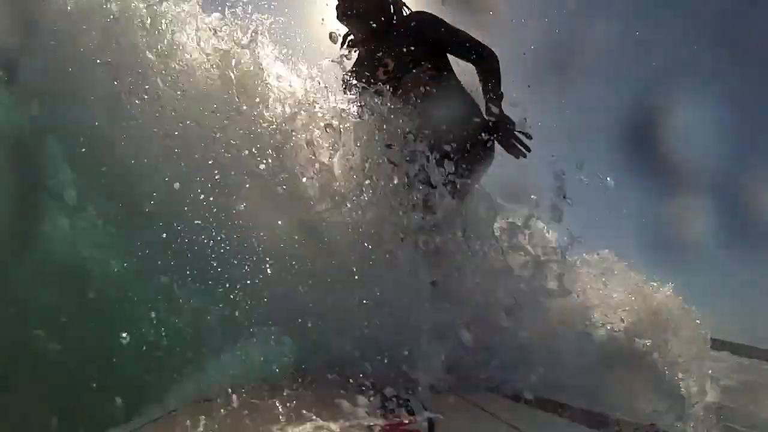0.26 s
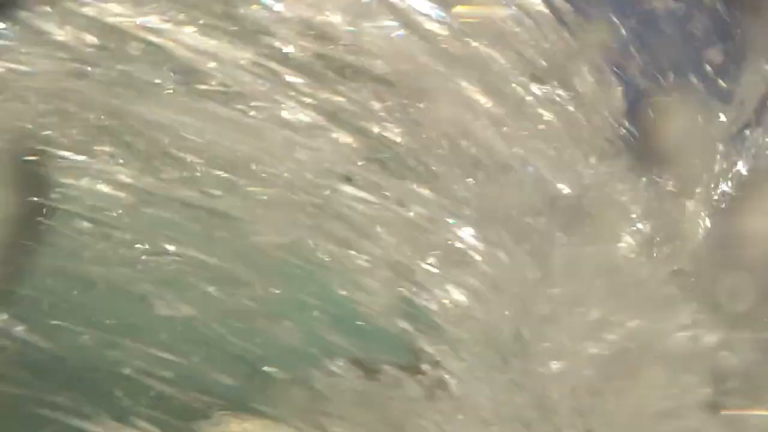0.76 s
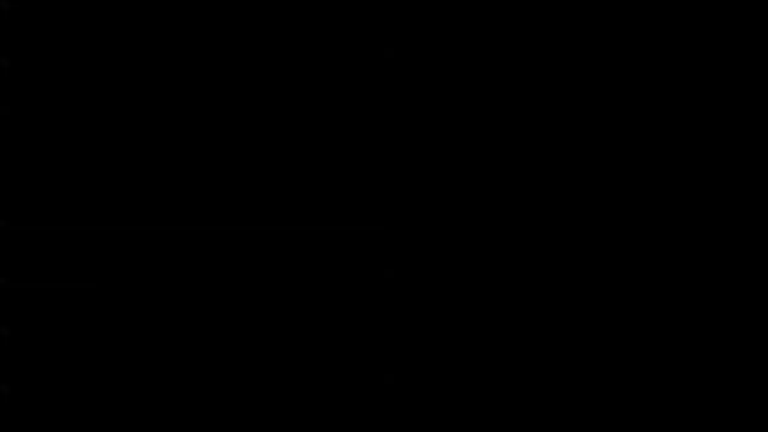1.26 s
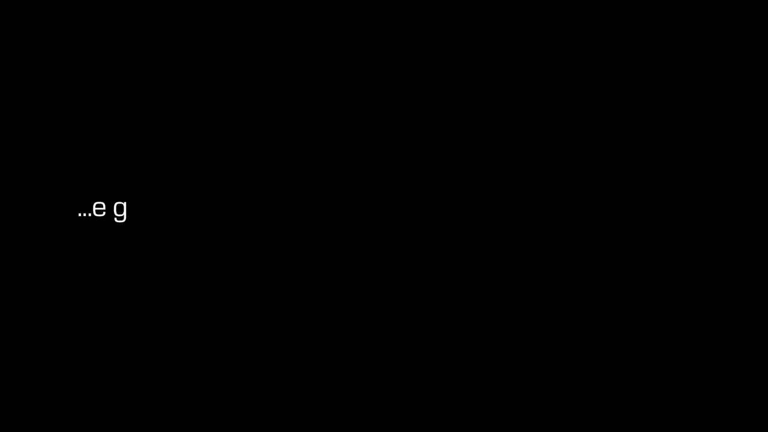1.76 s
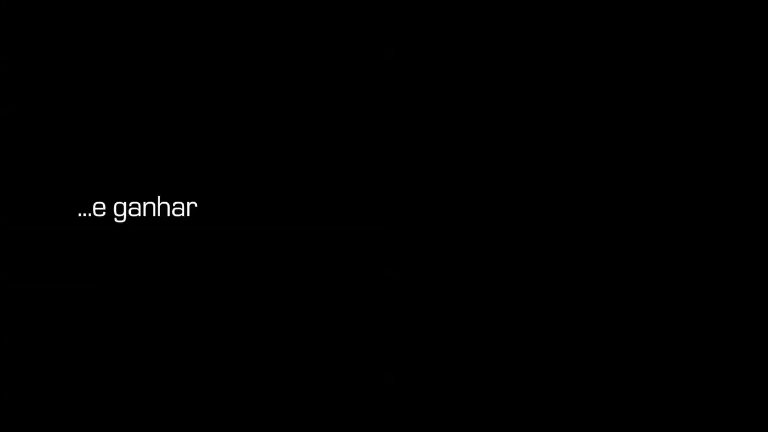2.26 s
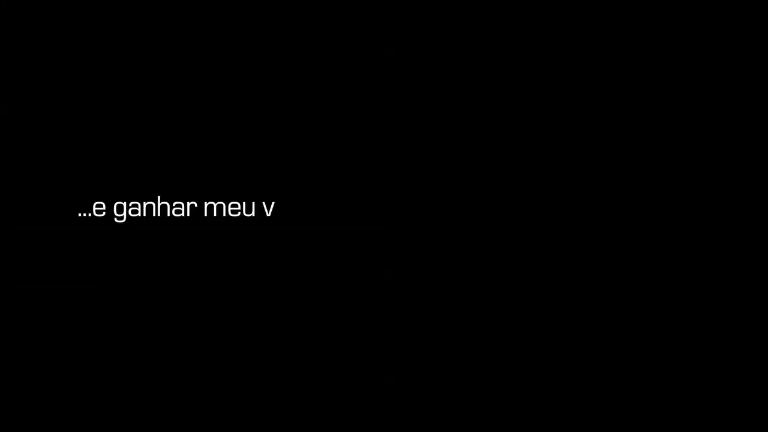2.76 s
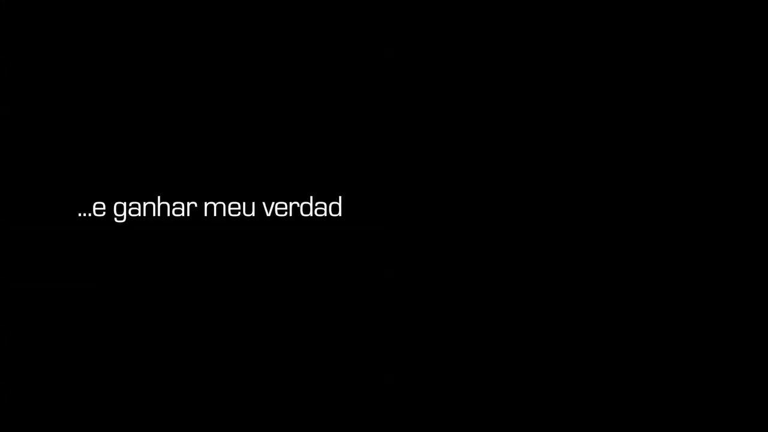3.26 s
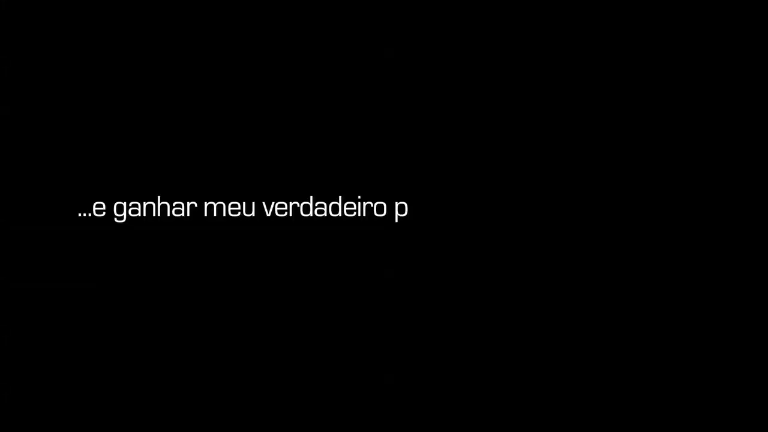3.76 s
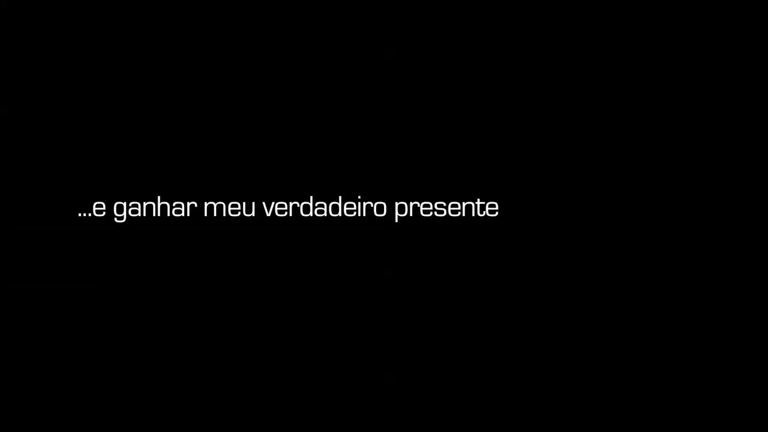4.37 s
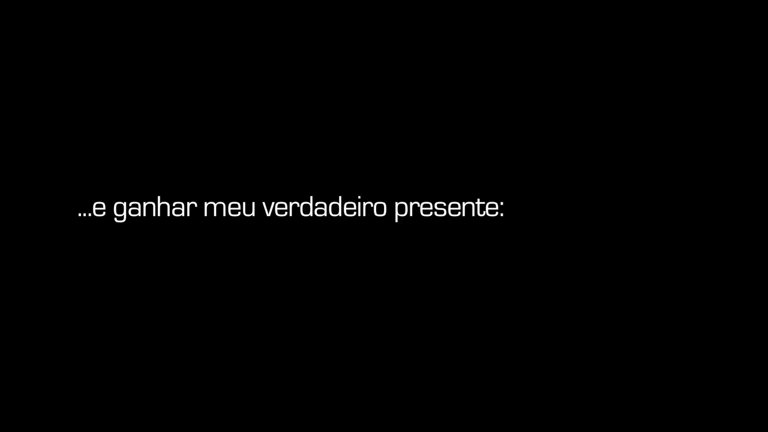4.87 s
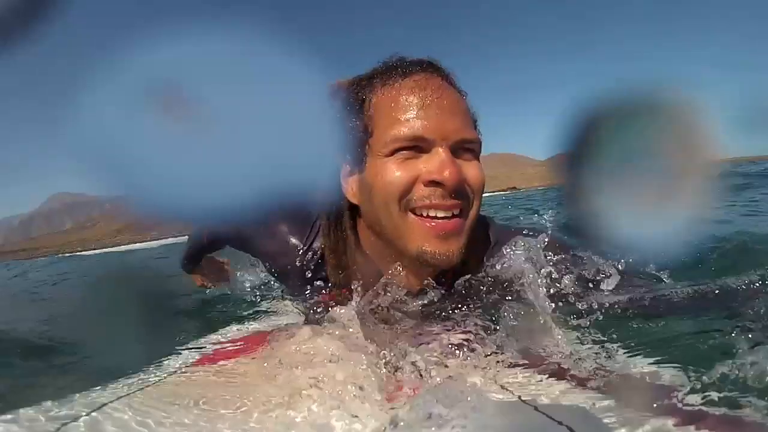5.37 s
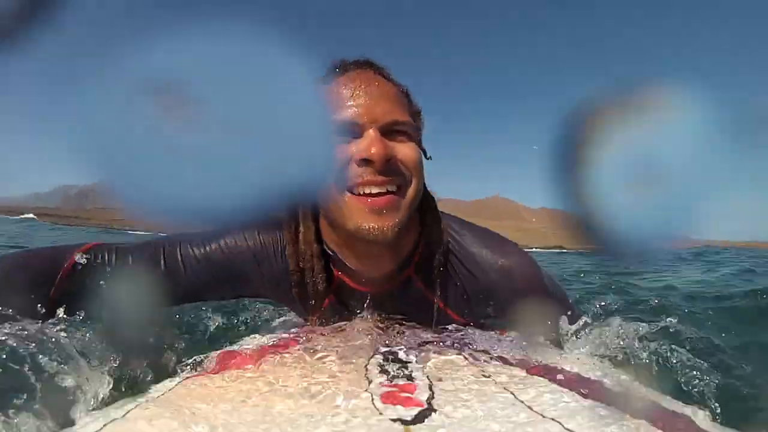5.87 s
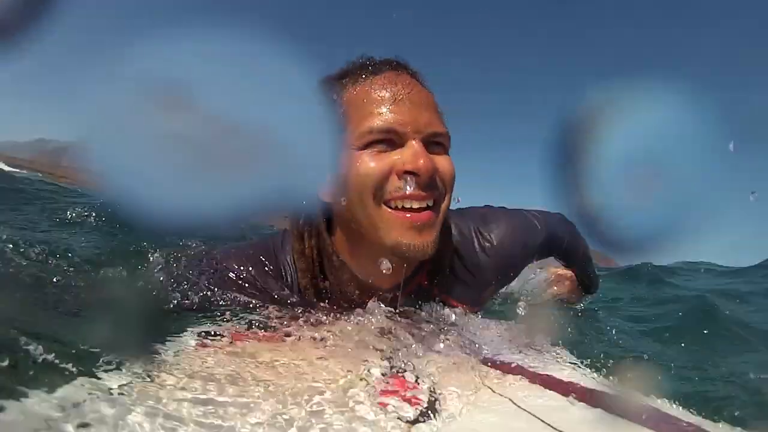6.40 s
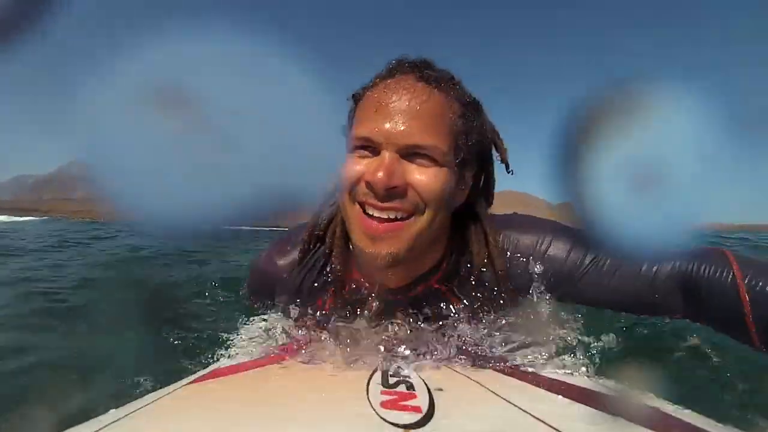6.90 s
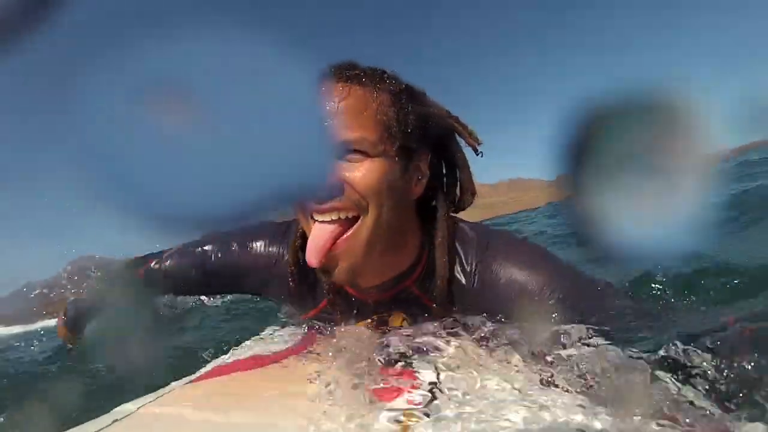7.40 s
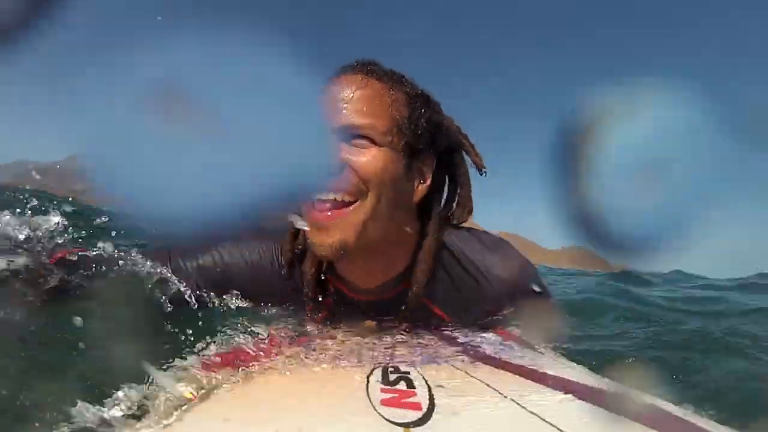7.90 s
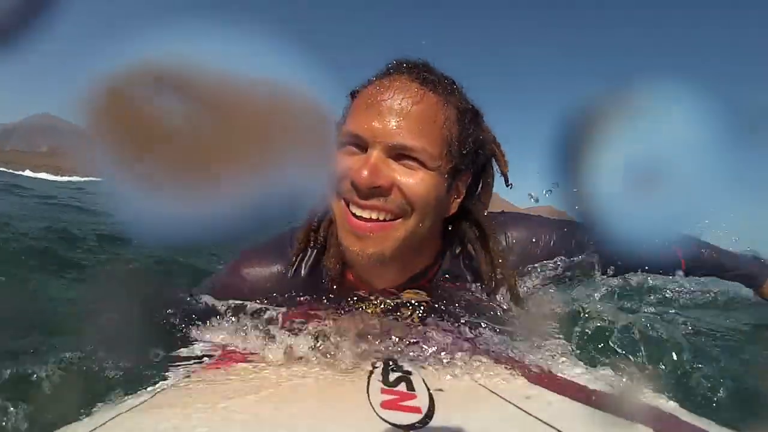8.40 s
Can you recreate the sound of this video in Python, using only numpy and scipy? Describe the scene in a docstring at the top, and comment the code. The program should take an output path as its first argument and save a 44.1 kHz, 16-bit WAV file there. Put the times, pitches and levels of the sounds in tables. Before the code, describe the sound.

Very close on a surfboard, a breaking wave rumbles, slaps and hisses over a waterproof case, with deep booms and a muffled submerged churn. It cuts abruptly to faint, irregular keyboard typing over soft ventilation in a room. Almost a second of complete silence follows. Then the sea returns loudly: paddling sloshes water across the board with low hollow thumps, gurgles, slaps and small drop ticks.

```python
"""Surf and typing

A waterproof case rides on a surfboard while a wave breaks over it; water is shaped noise and ringing bubbles.
Then a keyboard is typed on in a ventilated room (struck plastic over soft noise), and almost a second is silent.
Back at sea, paddling arms slosh water over the board: it booms in decaying low tones while drops tap the case.
"""
import sys
import numpy as np
from scipy import signal
from scipy.fft import rfft, irfft
from scipy.io import wavfile
from scipy.ndimage import uniform_filter1d, minimum_filter1d

SR = 44100
rng = np.random.default_rng(int(sys.argv[2]) if len(sys.argv) > 2 else 0)


def store_wav(level_fs):
    """Save 16-bit WAV to argv[1]."""
    pcm = np.round(np.clip(np.atleast_2d(level_fs), -1, 1) * 32767)
    wavfile.write(sys.argv[1], SR, pcm.T.astype(np.int16))


N = 381453
TIME = np.arange(N) / SR

RIDE, TYPING, PADDLE = (0, 1.289), (1.289, 4.503), (5.416, 8.66)  # (from s, to s)


def amp(db):
    """Turns decibels into a gain."""
    return 10 ** (np.asarray(db) / 20)


def evened(x):
    """Scales a sound to an rms of 1."""
    return x / np.sqrt(np.mean(x ** 2) + 1e-20)


def peaked(x):
    """Scales a sound to a peak of 1."""
    return x / (abs(x).max() + 1e-20)


def steadied(x, seconds):
    """Keeps the fast grain of a sound but holds its rms near 1 over the given time."""
    size = max(int(seconds * SR), 8)
    power = uniform_filter1d(uniform_filter1d(x ** 2, size), size)
    return x / np.sqrt(abs(power) + 1e-12)


def read(points, hz):
    """Reads a table of (f/Hz, value) on a log-frequency axis."""
    f, value = np.transpose(points)
    return np.interp(np.log(hz + 1), np.log(f + 1), value)


def add(mix, s, sound):
    """Adds a sound to the mix at time s."""
    part = mix[..., max(round(s * SR), 0):][..., :sound.shape[-1]]
    part += sound[..., :part.shape[-1]]


def ring_of(points, size=8192):
    """Turns a spectrum into a ring that starts at once; it falls 30 dB more per octave past its ends."""
    hz = abs(np.fft.fftfreq(size, 1 / SR)) + 1
    octaves_out = abs(np.log2(hz / np.clip(hz, points[0][0], points[-1][0])))
    level_db = np.maximum(read(points, hz) - 30 * octaves_out, -100)
    log_gain = np.log(amp(level_db))
    # the Hilbert transform finds the phase that puts all the sound after the start
    return np.fft.ifft(np.exp(np.conj(signal.hilbert(log_gain)))).real[:size // 2]


def coloured(x, points):
    """Passes a sound through a spectrum."""
    return signal.oaconvolve(x, ring_of(points))[:len(x)]


def rung(force, ring):
    """Gives a body's answer to a force on each side, scaled to an rms of 1."""
    answer = signal.fftconvolve(force, ring[None], axes=1)
    return evened(answer[:, :force.shape[1]])


def shot(span):
    """Is 1 inside a span of time and 0 elsewhere, with very short ramps."""
    return uniform_filter1d(1. * ((TIME >= span[0]) & (TIME < span[1])), size=64)


def wander(per_s, depth_db):
    """Makes a gain that drifts at random between per_s new values a second."""
    return amp(depth_db * np.interp(TIME * per_s, np.arange(N), rng.standard_normal(N)))


def struck(modes, t, detune):
    """Sums decaying tones of a struck body; each blow lands elsewhere and shifts them a little."""
    out = 0
    for hz, db, t60 in modes:
        shifted_hz = hz * (1 + detune * rng.uniform(-0.55, 1))
        out = out + amp(db - 60 * t / t60) * np.sin(2 * np.pi * shifted_hz * t)
    return out


def bubble(hz, cycles, glide=0.024):
    """A pocket of air rings for a few cycles and rises a little in pitch."""
    age = np.arange(int(5 * cycles * SR / hz) + 4) * hz / SR / cycles  # 1 when faded to 1/e
    fade = (1 - np.exp(-age * cycles)) * np.exp(-age)
    return fade * np.sin(2 * np.pi * cycles * age * (1 + glide * age / 2))


def bubbles(lo_hz, hi_hz, cycles, per_s, spread_db, wash, count=24):
    """A swarm of bubbles of many sizes, a few of them loud, over a white wash of countless faint ones."""
    chance, kind = rng.random(N), rng.integers(0, count, N)
    size = np.minimum(rng.exponential(1, N), 4)
    born, out = np.flatnonzero(chance < per_s / SR), np.zeros(N)
    pitches = np.geomspace(lo_hz, hi_hz, count)
    shapes = [bubble(hz, cycles) * np.sqrt(hz / lo_hz) for hz in pitches]
    for at in born:
        sign = (-1) ** at
        add(out, at / SR, shapes[kind[at]] * amp(spread_db * size[at]) * sign)
    return evened(out) + wash * rng.standard_normal(N)


def patter(per_s, spread_db):
    """Countless droplets, each a dry tick of its own size."""
    size = amp(spread_db * np.minimum(rng.exponential(1, N), 4))
    sign = np.sign(rng.standard_normal(N))
    return evened(size * sign * (rng.random(N) < per_s / SR))


SURGE_CURVE = 1.1  # 1 gives a pointed crest, 2 a rounded one


def swell(crest_s, rise_s, fall_s):
    """A gain that rises to 1 at the crest and drains away."""
    age = TIME - crest_s
    widths = np.maximum(-age / max(rise_s, .002), age / max(fall_s, .002))
    gain, near = np.zeros(N), widths < 8
    gain[near] = np.exp(-widths[near] ** SURGE_CURVE)
    return gain


# slow run of the water in each sea shot, before the mix:
# (t/s, buffeting of the board level/dB, gurgle under it level/dB, slosh on the case level/dB, spray level/dB)
RIDE_FLOW = [(0, -21, -23, -31.5, -41.5), (0.05, -12, -37, -26.5, -49), (0.17, -13.5, -38, -34.5, -59),
             (0.39, -20, -36, -36.5, -51), (0.57, -23, -39.5, -38, -55), (0.66, -19, -34, -35.5, -39),
             (0.85, -23.5, -35, -27, -34.5), (0.95, -15.5, -32, -37, -48.5),
             (1.07, -20.5, -39.5, -43.5, -47.5), (1.22, -12, -37.5, -41.5, -47.5),
             (1.28, -19.5, -37, -49.5, -56)]
PADDLE_FLOW = [(5.42, -15.5, -34, -38.5, -49.5), (5.59, -26, -40, -39.5, -60), (5.8, -26, -44, -28.5, -63),
               (5.91, -23, -45, -54, -80), (6.05, -26, -42, -40, -58.5), (6.23, -29, -35, -32.5, -54),
               (6.33, -17, -37.5, -48, -78), (6.52, -17.5, -34, -32.5, -50.5), (6.7, -29, -43, -43, -57),
               (6.83, -30, -42.5, -40.5, -61), (6.95, -18, -39, -32, -52), (7.17, -26, -28.5, -32, -61),
               (7.4, -28, -37.5, -36, -56.5), (7.61, -35.5, -37, -40, -68.5), (7.75, -27.5, -41, -41, -66),
               (8.1, -30.5, -42, -40, -58), (8.45, -25.5, -38.5, -41.5, -65),
               (8.65, -36.5, -41.5, -33.5, -49)]
# rushes of water across the board, before the mix:
# (crest t/s, rise t/s, fall t/s, gurgle level/dB, slosh level/dB, spray level/dB)
SURGES = [(0.031, 0.014, 0.013, -28.5, -38, -58), (0.32, 0.063, 0.044, -26.5, -24, -47),
          (0.448, 0.021, 0.055, -25, -26.5, -37), (0.612, 0.0041, 0.03, -38, -32, -30.5),
          (0.688, 0.0083, 0.034, -25.5, -15, -22.5), (0.779, .012, 0.048, -28.5, -29, -40),
          (0.98, 0.044, 0.013, -29.5, -30.5, -33), (5.758, .025, .018, -40.5, -27.5, -44.5),
          (5.823, 0.012, 0.027, -25.5, -25, -44), (5.882, 0.021, 0.0044, -20, -11.5, -37.5),
          (5.98, 0.046, 0.024, -32, -27, -68), (6.18, .015, .025, -35, -42, -62),
          (6.276, 0.014, 0.0092, -35, -36, -43.5), (6.345, 0.031, 0.059, -30, -32, -58),
          (6.505, 0.029, .04, -33.5, -33, -62), (6.897, .02, 0.0099, -35, -17.5, -45.5),
          (6.985, 0.033, 0.21, -53, -29, -48.5), (7.766, .004, 0.022, -45, -38, -42.5),
          (7.835, 0.032, 0.047, -25, -26, -48.5), (7.96, 0.013, 0.023, -41, -52, -46.5),
          (8.055, 0.0041, 0.015, -50, -42, -38), (8.26, 0.04, 0.064, -48, -41, -53),
          (8.402, 0.01, 0.013, -29, -26, -48)]
GULP_RISE_S, GULP_FALL_S = .003, 0.016


def water():
    """Strength of buffeting, gurgle, slosh and spray: slow flow, surges on top, a gulp after each blow."""
    s, *columns = np.transpose(list(RIDE_FLOW) + list(PADDLE_FLOW))
    power = np.array([amp(np.interp(TIME, s, c)) for c in columns]) ** 2
    for crest_s, rise_s, fall_s, *levels_db in SURGES:
        power[1:] += np.outer(amp(levels_db) ** 2, swell(crest_s, rise_s, fall_s) ** 2)
    for s, *_, gulp_db in BLOWS:
        gulp = swell(s + GULP_RISE_S, GULP_RISE_S, GULP_FALL_S)
        power[1] += (amp(gulp_db) * gulp) ** 2
    return np.sqrt(power)


# spectra of the shaken board, its drumming hollow, and the large and small air pockets: (f/Hz, level/dB)
RUMBLE = [(15, -16), (25, -5.5), (45, -5), (62, 3), (76, 7.5), (90, -1.5), (120, -21.5), (170, -28.5)]
DRUM = [(110, -10), (145, -2), (175, -1), (210, -7.5)]
GURGLE = [(110, -14.5), (150, -5), (200, -6), (235, -2.5), (262, 3.5), (300, -5.5), (400, -11), (520, -23)]
CHURN = [(330, -15.5), (430, 2.5), (520, -2), (680, 1.5), (790, -2), (900, -10), (1050, -11)]
SUNK, CHURNING = (.92, 1.34), (0.764, 1.34)  # s: the wave covers the board; small air pockets fill it
CHURN_SUNK_DB, CHURN_POWER = 7, 1.162  # small air pockets multiply faster than large ones
HEAVE_PER_S, HEAVE_DB = 14, 2.5  # the buffeting comes in uneven shoves
DRUM_DB, DRUM_POWER = -10, 1.61  # hard buffeting drums on the hollow of the slowly floating board


def under_board(buffet, gurgle):
    """Moving water shakes the board, and air pockets gurgle against its hollow."""
    churn = amp(CHURN_SUNK_DB * shot(CHURNING)) * gurgle ** CHURN_POWER
    buffet = buffet * wander(per_s=HEAVE_PER_S, depth_db=HEAVE_DB)
    rumble = steadied(coloured(rng.standard_normal(N), RUMBLE), seconds=.04)
    # under water the buffeting reaches higher
    sunk_spectrum = [(85, -1), (110, 14.5), (140, -2), (165, -19.0), (200, -32.5)]
    sunk = steadied(coloured(rng.standard_normal(N), sunk_spectrum), seconds=0.079)
    rumble += amp(-9.5) * sunk * uniform_filter1d(shot(SUNK), size=2048)
    drum = evened(coloured(rng.standard_normal(N), DRUM))
    rumble += amp(DRUM_DB) * shot(PADDLE) * buffet ** (DRUM_POWER - 1) * drum
    large = coloured(bubbles(150, 420, cycles=2.9, per_s=160, spread_db=1.0, wash=1.3), GURGLE)
    small = coloured(bubbles(400, 1000, cycles=3.8, per_s=400, spread_db=6.0, wash=4.7), CHURN)
    out = amp(-1.0) * buffet * rumble
    out += amp(-3.0) * gurgle * steadied(large, seconds=0.087)
    return out + amp(-3.0) * churn * steadied(small, seconds=0.023)


# spectra of the ringing case, the spray and the finest mist: (f/Hz, level/dB)
CASE = [(470, -21.5), (780, -6), (890, -18.5), (1000, -3), (1090, 2), (1200, -2), (1400, 2.5), (1610, -2.5),
        (2000, -0.5), (2400, 0.5), (2650, -7.5), (3000, -15.5), (3550, -18), (4500, -32.5)]
SPRAY = [(1800, -11), (3000, 0), (3700, 2), (4500, -3.5), (6000, -1.5), (7400, -4.5), (8600, -13),
         (11800, -14.5), (13000, -20), (15200, -26), (16000, -40)]
MIST = [(5000, -25.5), (7500, 6), (9000, 0), (11600, 1), (13000, -6), (15200, -9.5), (16000, -22)]
# the finest mist follows the spray weakly; speed adds to it (levels before the mix)
MIST_DB, MIST_POWER, MIST_RIDE_DB = -55.5, 0.21, 4.5


def over_case(slosh, spray):
    """Water sloshes on the case and throws spray; the finest mist differs from side to side: (2, N)."""
    mist = amp(MIST_DB + MIST_RIDE_DB * shot(RIDE)) * spray ** MIST_POWER
    lumps = wander(per_s=40, depth_db=3.5)  # water arrives in lumps, for large and small drops alike
    rush = 1 + 1.3 * shot(RIDE)  # at speed the bubbles merge into a smoother wash
    wet = bubbles(950, 3800, cycles=4.4, per_s=700, spread_db=4.5, wash=1.5 * rush, count=48)
    wet = coloured(wet, CASE)
    # spray both ticks on the case and fizzes
    ticks = 2.3 * patter(per_s=760, spread_db=5.0)
    fizz = bubbles(3000, 9000, cycles=6.7, per_s=520, spread_db=4.6, wash=0.86 * rush, count=48)
    fizz = coloured(ticks + fizz, SPRAY)
    fine = np.array([evened(coloured(rng.standard_normal(N), MIST)) for _ in range(2)]) * lumps
    middle = amp(-1.0) * slosh * steadied(wet * lumps, seconds=0.046)
    middle += spray * steadied(fizz * lumps, seconds=.05)
    sides = fine[0] + .45 * fine[1] * np.array([[1], [-1]])
    return middle + amp(-6.5) * mist * sides


# chop hitting the board, before the mix:
# (t/s, boom level/dB, hollow knock level/dB, boom f/Hz, gulp of trapped air level/dB)
BLOWS = [(0.04, -9, -38, 71, -37), (0.107, -6.5, -44, 70, -43.5), (0.55, -11, -43, 60, -38),
         (0.367, -5.5, -38, 67, -32), (0.444, -4, -30, 70, -36), (0.712, -3, -25, 58, -22.5),
         (0.99, -1.5, -21.5, 90, -29), (1.202, -5, -31, 102, -34), (1.226, -11, -57.5, 89.9, -41),
         (5.424, -15, -39, 75, -19.5), (5.877, -0.5, -23, 76, -23), (5.987, -13.5, -35, 77, -28),
         (6.269, -5, -37, 62, -22), (6.473, -8, -32, 73, -25), (6.886, -10, -30, 64, -17.5),
         (7.107, -7, -16, 74.5, -18), (7.439, -39, -36, 76, -30), (8.019, -21, -34, 103, -21),
         (8.226, -11, -28, 81, -21.5), (8.401, -14, -11, 68.4, -20.5)]
# higher modes of board and mount: (f/Hz, level/dB, time to fall 60 dB t/s)
BOARD = [(140, -5, 0.055), (180, -7, 0.05), (266, 6, 0.16), (341, -8, .03), (560, -12.5, .025),
         (690, -6, 0.022)]


def blows():
    """Chop strikes the board: a deep boom and a short hollow knock, both made of decaying tones."""
    out, t = np.zeros(N), np.arange(SR // 4) / SR
    for s, boom_db, knock_db, hz, _ in BLOWS:
        boom = struck([(hz, 0, .12)], t, detune=.01)
        knock = struck(BOARD, t, detune=.04)
        add(out, s, -amp(boom_db - 2) * peaked(boom) - amp(knock_db - 1.5) * peaked(knock))
    return out


# slaps of water on the case: (t/s, level/dB before the mix, trapped air f/Hz, fade t/s of the small pockets)
SLAPS = [(0.2612, -9, 1190, 0.014), (0.2896, -10.5, 1270, 0.028), (0.3668, -9, 1580, 0.0027),
         (0.446, -7.5, 2040, 0.01), (0.524, -14, 1350, 0.0074), (0.5316, -14.5, 1140, 0.0065),
         (0.606, -16, 1610, 0.018), (0.681, -9, 2300, 0.013), (0.718, -8.5, 2440, 0.011),
         (0.768, -12.5, 930, 0.0057), (0.9787, -14, 2340, 0.0066), (5.4277, -2, 1394, 0.0095),
         (5.4795, -18, 2270, 0.012), (5.527, -19.5, 2340, 0.0098), (5.6143, -15, 1490, 0.004),
         (5.721, -15, 2200, 0.0045), (5.7466, -13, 1220, 0.013), (5.806, -13.5, 1170, 0.0059),
         (5.8162, -7, 1340, 0.022), (5.852, -8, 1240, 0.0082), (5.863, -6, 1190, 0.0054),
         (5.8764, -0.5, 1270, 0.0028), (6.2726, -15, 1280, 0.0031), (6.604, -18.5, 2060, 0.0054),
         (6.763, -24, 1510, 0.0046), (6.853, -16.5, 2310, 0.0079), (6.8873, -8.5, 940, 0.0079),
         (6.8982, -7.5, 1120, 0.011), (6.9843, -12, 2650, 0.0036), (7.0104, -8.5, 1350, 0.0086),
         (7.104, -4, 1090, 0.014), (7.1113, -4, 1190, 0.0058), (7.218, -13.5, 1174, 0.0091),
         (7.5474, -17.5, 1310, 0.0078), (7.6743, -17.5, 1920, 0.008), (7.764, -19, 1480, 0.0071),
         (7.8223, -11.5, 1350, 0.022), (7.845, -12, 1840, 0.011), (8.0197, -11.5, 1270, 0.0011),
         (8.085, -16.5, 2210, 0.0099), (8.2079, -17, 1410, 0.006), (8.2254, -18, 2070, 0.0027),
         (8.3521, -18, 2140, 0.0084), (8.3767, -14, 1450, 0.01), (8.401, -9, 1570, 0.012),
         (8.484, -13, 1660, 0.0039), (8.491, -11, 1390, 0.0046), (8.583, -15, 1430, 0.029)]


def slaps():
    """A slap traps one large pocket of air and a clump of small ones; the case rings with them."""
    out, case, t = np.zeros(N), ring_of(CASE), np.arange(4096) / SR
    for s, db, hz, length in SLAPS:
        fade = np.exp(-t / max(length, 1e-3)) * (1 - np.exp(-t / 0.00065))
        clump = rng.standard_normal(len(t)) ** 3 * fade
        # big pockets make dull slaps
        clump = coloured(clump, [(0.45 * hz, -5), (hz, 0), (2 * hz, -5), (4 * hz, -9)])
        clump = signal.fftconvolve(clump, case)
        pocket = signal.fftconvolve(bubble(hz, cycles=3.1), case)
        add(out, s, amp(db + 11.5) * clump / np.linalg.norm(clump))
        add(out, s, amp(db + 12.5) * pocket / np.linalg.norm(pocket))
    return out


# large bubbles that plop beside the board: (t/s, level/dB before the mix, f/Hz)
PLOPS = [(0.462, -3.5, 233), (0.491, -6, 217), (0.934, -5.5, 700), (0.973, -37, 186), (5.444, -31, 188),
         (6.174, -12.5, 660), (6.337, -11.5, 296), (6.392, -11.5, 310), (6.418, -15, 360),
         (6.476, -6.5, 184), (6.889, -18, 240), (7.272, -9.5, 620), (7.436, -10, 217), (7.613, -20, 226),
         (7.887, -14, 645), (8.021, -13.5, 322), (8.283, -10, 203), (8.299, -14, 246)]


def plops():
    """Large bubbles ring low and glide upward."""
    out = np.zeros(N)
    for s, db, hz in PLOPS:
        add(out, s, amp(db - 12.0) * peaked(bubble(hz, cycles=1.7, glide=.07)))
    return out


# single drops on the case, levels before the mix: (t/s, level/dB, f/Hz, bright tick level/dB)
DROPS = [(0.444, -21, 3140, -36), (0.4887, -28, 8140, -39), (0.569, -33, 3560, -45),
         (0.584, -23, 5500, -42), (0.6073, -26, 3700, -36), (0.615, -33, 3470, -30),
         (0.6408, -27, 3900, -41), (0.6558, -22, 7350, -30), (0.679, -19, 4200, -28),
         (0.6844, -24, 4800, -34), (1.0888, -26.5, 3380, -60), (1.2825, -30.5, 5450, -44.5),
         (5.553, -34.5, 3500, -67), (5.6326, -31.5, 3500, -65), (5.8069, -27, 3560, -74),
         (6.0564, -38, 6300, -59), (6.512, -37, 2940, -53), (6.533, -34, 3560, -45),
         (6.554, -28, 3470, -58), (6.5742, -32, 3450, -48), (6.6213, -32, 6540, -52),
         (6.627, -28, 3620, -59), (6.648, -21.5, 3460, -56), (6.6802, -28, 5700, -62),
         (6.7621, -29.5, 3320, -63), (6.8024, -23.5, 6700, -43), (7.0957, -30, 3620, -62),
         (7.219, -25.5, 3280, -59), (7.3492, -27.5, 5500, -60), (7.3666, -29, 3100, -62),
         (7.7633, -31, 6600, -41), (7.8683, -32.5, 3880, -47.5), (8.0473, -27.5, 3730, -45),
         (8.0594, -36, 3980, -50), (8.081, -35, 3100, -42), (8.5982, -35, 6200, -59)]


def drops():
    """A drop ticks on the case and traps a tiny bubble that rings briefly."""
    out, t = np.zeros(N), np.arange(1024) / SR
    for s, db, hz, tick_db in DROPS:
        burst = rng.standard_normal(len(t)) * np.exp(-t / 0.0028) * (1 - np.exp(-t / 0.00068))
        add(out, s, amp(db - 0.5) * peaked(bubble(hz, cycles=6.8, glide=0.012)))
        add(out, s, amp(db - 9) * peaked(coloured(burst, SPRAY)))
        add(out, s, amp(db + 1) * peaked(coloured(burst, CASE)))
        add(out, s, amp(tick_db + 8.5) * peaked(coloured(burst, MIST)))
    return out


def drips(spray):
    """Stray drops fall back out of the spray; each traps a tiny bubble that rings clearly."""
    rings = bubbles(2500, 7400, cycles=11, per_s=24, spread_db=5.0, wash=0, count=40)
    return amp(-21) * spray ** 0.74 * rings


# key strokes, some led by a lighter touch of the cap before the key bottoms out; levels before the mix: # (t/s,
# click level/dB, thock of the key bed level/dB, thock f/Hz, cap f/Hz, rattle fade t/s)
KEYS = [(1.3452, -33.5, -39.5, 980, 3530, 0.00083), (1.448, -33.5, -34.5, 806, 2360, 0.0026),
        (1.5273, -28.5, -41.5, 925, 9360, 0.0038), (1.5394, -32, -41, 597, 2670, 0.007),
        (1.661, -27.5, -39, 1050, 3720, 0.00096), (1.699, -29, -30, 994, 2560, 0.0023),
        (1.75, -37.5, -46, 630, 3560, 0.0035), (1.883, -27, -38, 800, 4160, 0.0029),
        (1.967, -34, -48.5, 626, 5700, 0.0065), (2.186, -42.5, -48.5, 729, 2670, 0.0031),
        (2.319, -32.5, -35, 993, 2700, 0.0037), (2.361, -29, -45, 1020, 3500, 0.0013),
        (2.455, -43.5, -61, 600, 5700, 0.0038), (2.493, -38, -60, 620, 9790, 0.0043),
        (2.5084, -29.5, -28.5, 910, 8800, 0.0069), (2.6525, -27.5, -44, 810, 6940, 0.0044),
        (2.663, -25, -40, 597, 5750, 0.0076), (2.9083, -31.5, -39.5, 650, 9200, 0.0033),
        (3.038, -26, -34, 1140, 10100, 0.005), (3.076, -26, -34, 1010, 3550, 0.0023),
        (3.1916, -36.5, -54, 610, 5500, 0.00081), (3.231, -25, -31.5, 954, 8640, 0.0032),
        (3.39, -31.5, -40.5, 590, 7460, 0.0057), (3.515, -26.5, -38, 630, 2780, 0.0032),
        (3.543, -27.5, -36, 960, 12600, 0.0034), (3.6091, -37, -54, 830, 5670, 0.0044),
        (3.6301, -33.5, -42.5, 596, 3520, 0.0076), (3.6844, -22, -29.5, 900, 8900, 0.0047),
        (3.813, -31.5, -58, 600, 3160, 0.0092), (3.823, -30, -57, 622, 5800, 0.0092),
        (4.094, -39, -57, 1110, 3000, 0.0024), (4.1658, -42.5, -49, 760, 2660, 0.0031),
        (4.313, -23.5, -29, 1095, 8200, 0.008), (4.451, -36.5, -42, 667, 3210, 0.0043),
        (4.463, -42, -41.5, 872, 3090, 0.0041)]
# modes of the keyboard: (multiple of the thock f, level/dB, time to fall 60 dB t/s)
KEY_BED = [(.63, -18, 0.061), (1.002, 10.5, 0.035), (1.14, -4, 0.068), (1.37, -8.5, 0.063),
           (1.7, 1, 0.0033), (2.4, -5.5, 0.013)]
# spectrum of the click: (f/Hz, level/dB)
KEY_CLICK = [(500, 8), (1200, 15), (2200, 6.5), (4000, 5.5), (7000, 2.5), (9500, 5.5), (11300, -2),
             (12800, 4.5), (14000, -3), (15200, 2), (16200, -52)]


def keys():
    """Plastic caps click and rattle, the key bed thocks, and each cap settles with a softer contact: (2, N)."""
    out, t, click_ring = np.zeros((2, N)), np.arange(SR // 5) / SR, ring_of(KEY_CLICK)
    for s, click_db, thock_db, thock_hz, cap_hz, length in KEYS:
        fade = np.exp(-t / max(length, .001))
        fade += amp(-24.0) * np.exp(-t / 0.0095) + amp(-30) * np.exp(-t / 0.038)
        # the cap chatters
        grit = amp(3.1 * np.interp(t * 700, np.arange(len(t)), rng.standard_normal(len(t))))
        noise = rng.standard_normal((2, len(t))) + 0.59 * rng.standard_normal(len(t))
        rattle = noise * fade * grit * (1 - np.exp(-t / 0.0003))
        cap = struck([(cap_hz, 0, .007)], t, detune=0.018)
        click = rung(rattle, click_ring) + 0.41 * rung(rattle, cap)
        bed = struck([(k * thock_hz, db, t60) for k, db, t60 in KEY_BED], t, detune=0.026)
        thud = rung(rattle.mean(0)[None], bed * np.exp(-t / 0.0075))
        thock = 0.72 * evened(bed) + 0.75 * thud
        add(out, s, amp(click_db - 24.0) * click + amp(thock_db - 14.5) * thock)
        # a faint noise swells for 20 ms before the click
        lead_in = rung(rng.standard_normal((2, len(t))), click_ring)[:, :SR // 50]
        lead_in = lead_in * np.linspace(0, 1, SR // 50) ** 1.8
        add(out, s - lead_in.shape[1] / SR, amp(click_db - 28) * lead_in)
        settle = amp(click_db - 47.5) * click + amp(thock_db - 29.5) * thock
        add(out, s + rng.uniform(0.014, 0.026), settle)
    return out


# spectrum of the room air: (f/Hz, level/dB)
ROOM = [(10, 13), (20, -5.5), (35, -4.5), (65, -6), (110, -11), (250, -16.5), (500, -22.5), (900, -29),
        (1500, -35), (3000, -44), (6000, -52), (13000, -53.5), (16000, -61)]
# how alike left and right are: (f/Hz, likeness, where 1 is the same)
ROOM_SAME = [(60, .99), (640, 0.98), (1400, 0.78), (3100, 0.11), (7000, 0.056)]


def room():
    """The dull rush of a ventilated room: shaped noise, more alike on both sides at low pitch: (2, N)."""
    hz = np.fft.rfftfreq(N, 1 / SR)
    a, b = rfft(rng.standard_normal((2, N)))
    same = np.clip(read(ROOM_SAME, hz), -1, 1)
    sides = np.array([a, same * a + np.sqrt(1 - same ** 2) * b])
    air = irfft(sides * amp(read(ROOM, hz)), N)
    return amp(-31.5) * evened(air) * wander(per_s=7.7, depth_db=-3.0)


def scene():
    """Plays sea, keyboard, silence, sea."""
    buffet, gurgle, slosh, spray = water()
    sea = under_board(buffet, gurgle) + over_case(slosh, spray)
    sea = sea + blows() + slaps() + plops() + drops() + drips(spray)
    return sea * (shot(RIDE) + shot(PADDLE)) + (keys() + room()) * shot(TYPING)


def record(dry):
    """A fast limiter holds the hardest slaps down; then a filter removes what lies above the band edge."""
    headroom = .95 / np.maximum(abs(dry).max(0), .95)
    gain = uniform_filter1d(minimum_filter1d(headroom, size=200), size=200)
    low_pass = signal.firwin(511, 16200, window=("kaiser", 9), fs=SR)  # edge in Hz
    return signal.oaconvolve(dry * gain, low_pass[None], "same")


dry = scene()
out = record(dry)
store_wav(out)
```